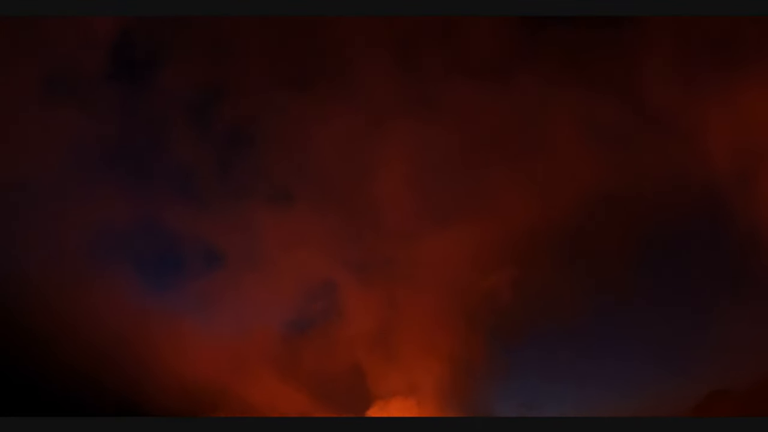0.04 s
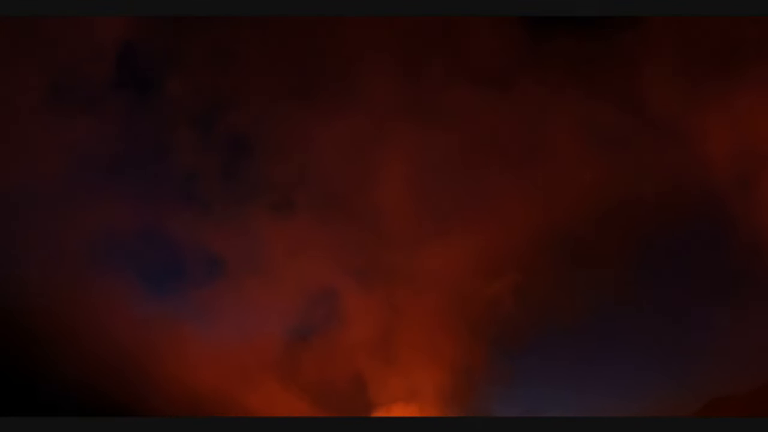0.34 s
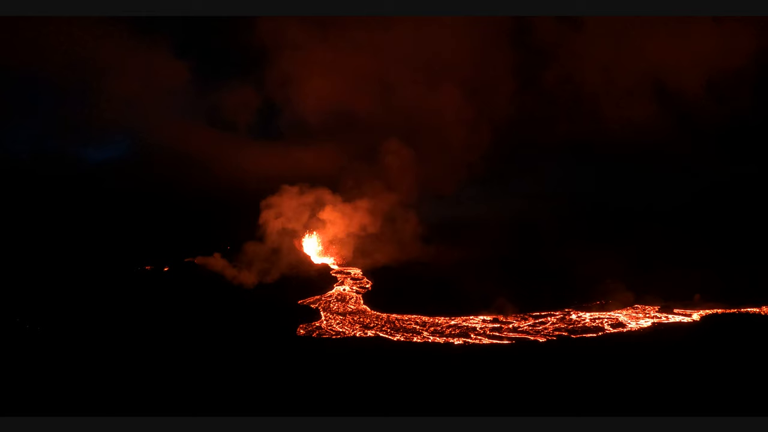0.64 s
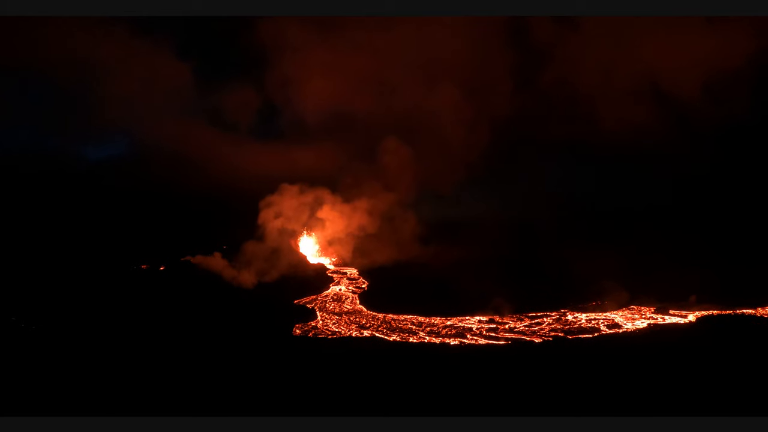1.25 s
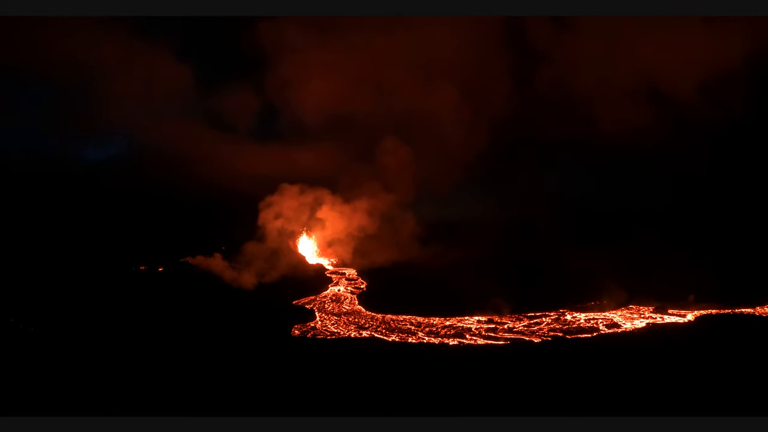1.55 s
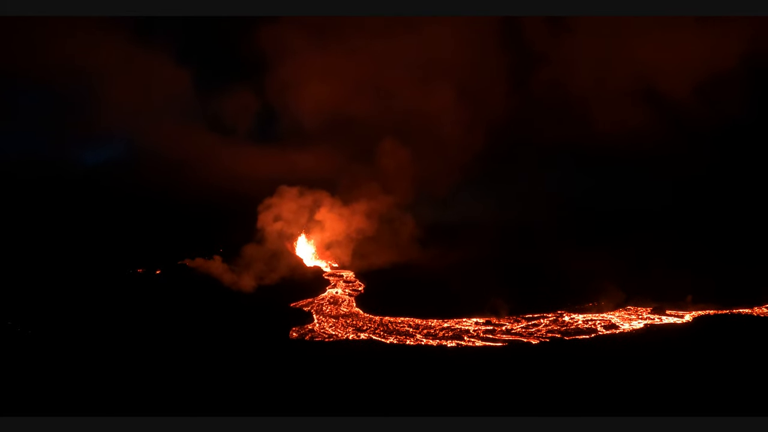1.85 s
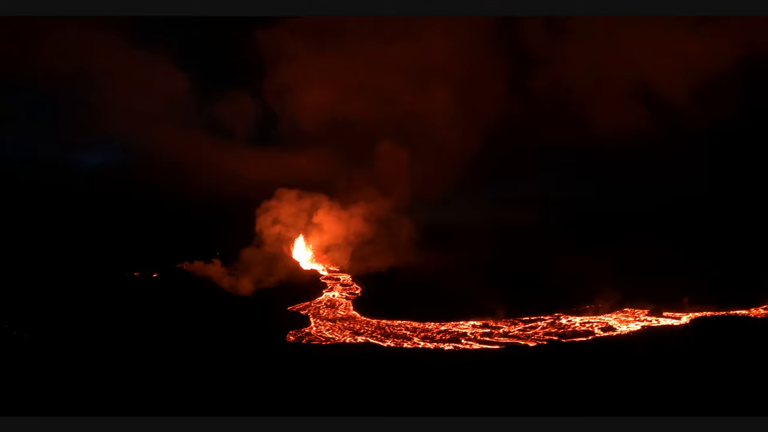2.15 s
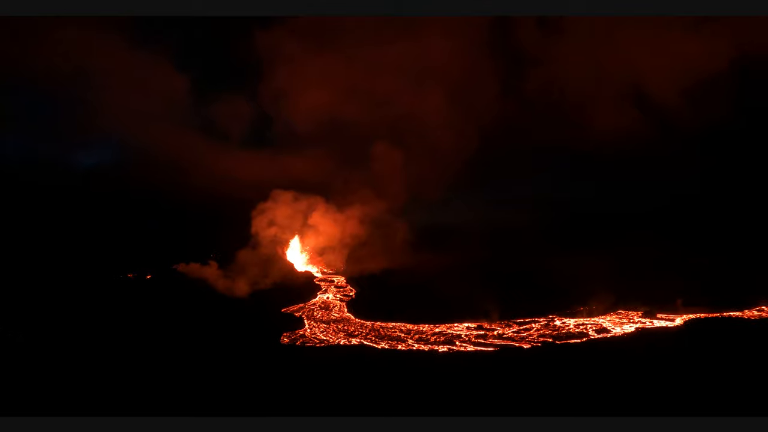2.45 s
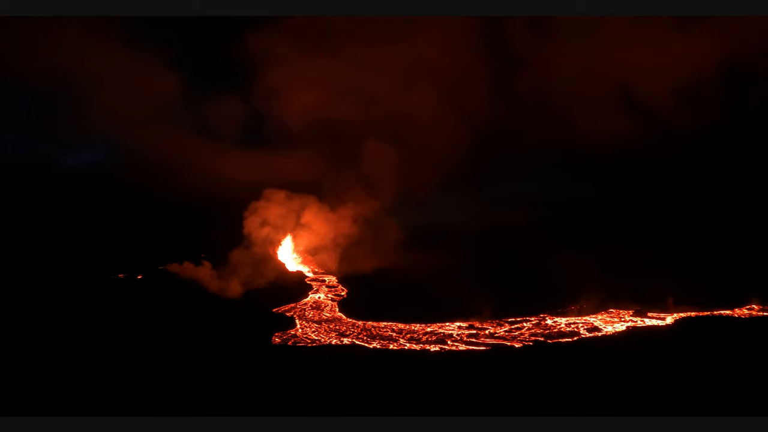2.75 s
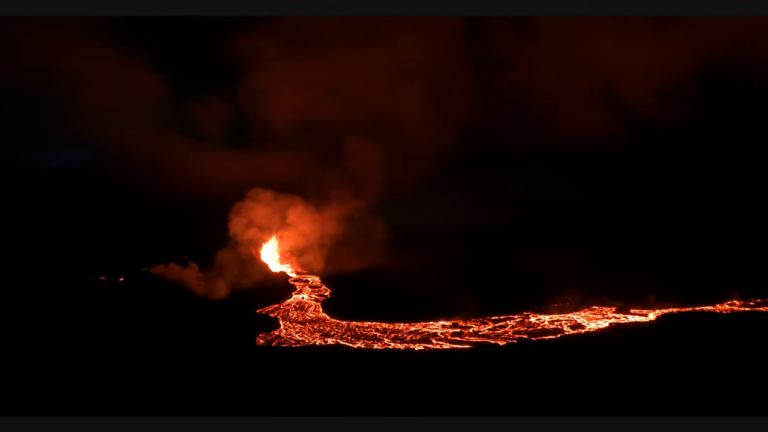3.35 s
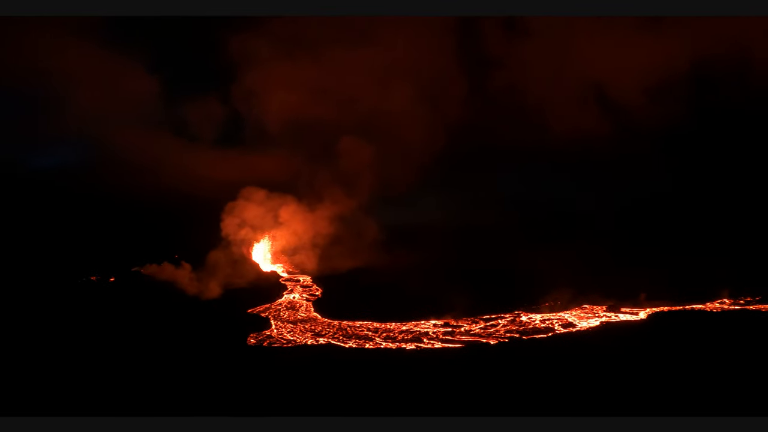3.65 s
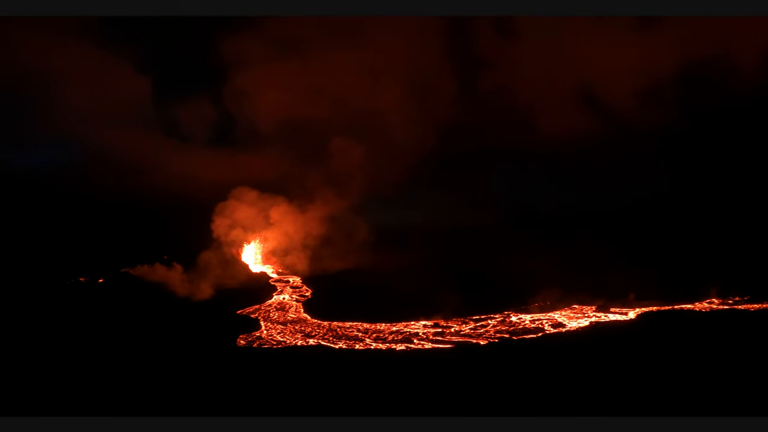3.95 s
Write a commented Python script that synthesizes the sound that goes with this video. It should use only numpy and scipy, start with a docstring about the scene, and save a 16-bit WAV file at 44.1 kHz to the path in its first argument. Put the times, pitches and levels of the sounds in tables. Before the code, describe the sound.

A far lava fountain makes a steady rushing roar in the open air. After a brief silent gap it returns, now with rough wind buffeting the microphone in short blasts and faint cloth swishes and ticks nearby.

```python
"""Windy night near a volcano

A far lava fountain roars, a rush of noise with flickering octaves, while eddies buffet the microphone.
A calmer scene cuts to silence; a windier one fades in, with flutter, short blasts and two falling tones.
Close by, cloth (probably a jacket) rustles as it slides and ticks as its creases snap."""
import sys
import numpy as np
from scipy import signal
from scipy.fft import rfft, irfft
from scipy.io import wavfile
from scipy.ndimage import uniform_filter1d

SR = 44100
rng = np.random.default_rng(int(sys.argv[2]) if len(sys.argv) > 2 else 0)


def store_pcm(level_fs):
    """Save levels as 16-bit WAV."""
    pcm = np.round(np.clip(level_fs, -1, 1) * 32767).astype(np.int16)
    wavfile.write(sys.argv[1], SR, np.atleast_2d(pcm).T)


N = 176400
TIME_S = np.arange(N) / SR
FREQ_HZ = np.maximum(np.fft.rfftfreq(N, 1 / SR), 1)


def undb(db):
    """Decibels to gain."""
    return 10 ** (np.asarray(db) / 20)


def envelope(rows):
    """Gain from (time_s, level_db) rows, linear in dB."""
    return undb(np.interp(TIME_S, *np.array(rows, float).T))


def unit(x):
    """Scale to rms 1."""
    return x / np.sqrt(np.mean(x ** 2))


def walk(rate_hz):
    """Smooth random drift, rms 1."""
    width = max(int(SR / rate_hz), 2)
    drift = uniform_filter1d(rng.standard_normal(N), width, mode="wrap")
    return unit(uniform_filter1d(drift, width, mode="wrap"))


def even(x, span_s):
    """Even out the strength of successive eddies over span_s; rms 1."""
    power = np.mean(np.atleast_2d(x) ** 2, axis=0)
    power = uniform_filter1d(power, int(span_s * SR))
    power = uniform_filter1d(power, int(span_s * SR / 2))
    return unit(x / np.sqrt(abs(power) + 1e-6))


def burst(centre_s, length_s):
    """Rounded swell, peak 1."""
    return 1 / np.sqrt(1 + (2 * (TIME_S - centre_s) / length_s) ** 4)


def stroke(start_s, attack_s, hold_s, decay_s):
    """Smooth rise, hold, exponential decay."""
    rise = .5 + .5 * np.tanh((TIME_S - start_s) / attack_s)
    return rise * np.exp(-np.maximum(TIME_S - start_s - hold_s, 0) / decay_s)


def colour(x, spectrum):
    """Filter by (freq_hz, gain_db) rows, falling steeply beyond both ends."""
    freq_hz, gain_db = np.array(spectrum, float).T
    gain = undb(np.interp(np.log(FREQ_HZ), np.log(freq_hz), gain_db))
    skirts = np.minimum(FREQ_HZ / freq_hz[0], 1) ** 3 * np.minimum(freq_hz[-1] / FREQ_HZ, 1) ** 3
    return irfft(rfft(x) * gain * skirts, N)


# Left-right difference of the microphone ports: freq_hz, gain_db
SIDE_SPECTRUM = [(20, -4.5), (300, -12.5), (700, 2.5), (2000, 1.5), (5000, 14), (14000, 5.5)]

def stereo_noise(spectrum, side_db=-65):
    """Coloured mid/side noise, rms 1; near mono by default."""
    mid, side = colour(rng.standard_normal((2, N)), spectrum)
    side = undb(side_db) * colour(side, SIDE_SPECTRUM)
    return unit(np.array([mid + side, mid - side]))


# Fountain spectra, calm and windy scene: freq_hz, relative_db
CALM_ROAR_SPECTRUM = [(170, -1), (280, -3.5), (400, -3.5), (530, -11), (660, -9), (850, -10.5),
                      (1100, -9.5), (1420, -15), (1700, -17), (1900, -16.5), (2150, -18), (2450, -20.5),
                      (2700, -21.5), (3000, -26.5), (3500, -29.5), (4300, -33), (5200, -36.5),
                      (6000, -46.5), (8000, -54), (10000, -62.5), (13000, -73)]
WINDY_ROAR_SPECTRUM = [(250, 1), (400, 6), (530, -0.5), (660, 7.5), (850, -1), (1100, 5), (1420, -3.5),
                       (1700, -0.5), (1900, -5.5), (2150, -2.5), (2450, -8.5), (2700, -9), (3000, -13.5),
                       (3500, -16), (4300, -25.5), (5200, -35.5), (6500, -39), (8000, -47.5), (12000, -71)]
# Fountain level, windy scene: time_s, level_db
WINDY_ROAR_LEVEL = [(.95, -47.5), (1.1, -41), (1.2, -38.5), (1.45, -37), (1.62, -35), (1.87, -34.5),
                    (2.12, -38.5), (2.4, -36.5), (2.55, -38), (2.75, -35), (3, -35.5), (3.28, -39.5),
                    (3.48, -35.5), (3.63, -36), (3.78, -36.5), (3.9, -37), (4, -40.5)]

def lava_fountain(spectrum, side_db=-65, flicker_db=0.8):
    """A far, steady rush whose octaves flicker on the way through the air."""
    rush = rfft(stereo_noise(spectrum, side_db))
    octave = np.clip(np.log2(FREQ_HZ / 125), 0, 6)
    roar = 0
    for k in range(7):
        band = irfft(rush * np.maximum(1 - abs(octave - k), 0), N)
        roar += band * undb(flicker_db * walk(rate_hz=42))
    return unit(roar)


# Cloth strokes: start_s, hold_s, level_db
SWISHES = [(0.114, 0.045, -57), (0.974, 0.54, -59.5), (1.135, 0.021, -48.5), (1.17, 0.19, -56.5),
           (1.232, 0.03, -41), (1.287, 0.026, -47.5), (1.335, 0.32, -56), (1.67, .16, -60.5),
           (1.73, 0.033, -54.5), (1.845, 0.13, -56.5), (2.07, 0.17, -65), (2.379, 0.007, -48.5),
           (2.427, 0.021, -53), (2.475, 0.098, -60.5), (2.617, 0.14, -65), (2.91, 0.041, -70.5),
           (3.078, 0.032, -56.5), (3.163, 0.066, -61), (3.24, 0.1, -71), (3.328, 0.18, -59.5),
           (3.518, 0.1, -63), (3.913, 0.1, -59.5)]
# Cloth friction spectrum: freq_hz, relative_db
CLOTH_SPECTRUM = [(1000, -17.5), (2500, 11.5), (4700, 9), (6400, 4), (8000, 0.5), (9000, -8), (10200, -12),
                  (12000, -26), (14000, -31.5)]
SNAP_DECAY_S = 0.002

def cloth_swishes(snaps_per_s=140, snap_db=0.5, snap_spread_db=4.2, grain_db=1):
    """Fabric slides in grainy, finely crackling swishes; longer strokes start more gently."""
    power = 0
    for start_s, hold_s, level_db in SWISHES:
        attack_s = 0.0095 + .08 * hold_s
        power += (undb(level_db) * stroke(start_s, attack_s, hold_s, decay_s=0.018)) ** 2
    onsets = rng.random(N) < snaps_per_s / SR
    snaps = onsets * undb(snap_db + snap_spread_db * rng.standard_normal(N))
    crackle_power = signal.lfilter([1], [1, -np.exp(-2 / (SNAP_DECAY_S * SR))], snaps ** 2)
    grain_power = unit(undb(grain_db * walk(rate_hz=300))) ** 2
    return stereo_noise(CLOTH_SPECTRUM) * np.sqrt(power * (grain_power + crackle_power))


# Crease snaps: start_s, relative_db, centre_hz
TICKS = [(1.1508, -56, 7000), (1.5055, -45, 7000), (1.5104, -46, 7000), (1.5294, -37, 5200),
         (1.5404, -54, 8500), (1.5978, -46, 6500), (1.6244, -56, 9000), (1.7315, -39, 5500),
         (1.7893, -44, 5500), (2.0857, -48, 6000), (2.5674, -57, 6460), (2.6944, -54, 7500),
         (3.197, -47, 6650), (3.459, -51, 6800), (3.6581, -47, 5500)]

def cloth_ticks(gain_db=-3.5, half_width_octaves=0.38):
    """Creases snap softly, each in its own noise band."""
    white = rfft(rng.standard_normal(N))
    ticks = 0
    for start_s, relative_db, centre_hz in TICKS:
        band_pass = 1 / (1 + (np.log2(FREQ_HZ / centre_hz) / half_width_octaves) ** 4)
        band = unit(irfft(white * band_pass, N))
        snap = stroke(start_s, attack_s=.0008, hold_s=0, decay_s=SNAP_DECAY_S)
        ticks += band * snap * undb(relative_db + gain_db)
    return ticks


# Falling tones: centre_s, length_s, level_db, pitch_hz
FALLING_TONES = [(2.582, .03, -31.5, 380), (2.875, .019, -24.5, 440)]

def falling_tones(fall_octaves_per_s=14, jitter_hz=50):
    """Two brief, hollow, falling tones within the wind blasts."""
    tones = 0
    for centre_s, length_s, level_db, pitch_hz in FALLING_TONES:
        offset_s = np.clip(TIME_S - centre_s, -length_s, length_s)
        glide_hz = pitch_hz * 2 ** (-fall_octaves_per_s * offset_s)
        phase = 2 * np.pi * np.cumsum(glide_hz + jitter_hz * walk(rate_hz=400)) / SR
        tones += unit(np.sin(phase)) * undb(level_db) * burst(centre_s, length_s)
    return tones


# Fine turbulence spectrum: freq_hz, relative_db
FLUTTER_SPECTRUM = [(60, 6.5), (140, 2.5), (250, 3.5), (400, 0.5), (700, -7.5), (1200, -17), (2500, -48),
                    (5000, -45.5)]
# Fine turbulence level: time_s, level_db
FLUTTER_LEVEL = [(1, -36), (1.15, -32), (1.35, -26), (1.56, -28.5), (1.75, -27.5), (1.9, -31), (2.1, -32.5),
                 (2.24, -31), (2.35, -34), (2.62, -34.5), (2.8, -32.5), (2.97, -34.5), (3.12, -38),
                 (3.25, -43), (3.5, -48.5), (4, -42)]

def wind_flutter(roughness_db=1.5):
    """Small eddies arrive in rough, rapid puffs."""
    puffs = undb(roughness_db * walk(rate_hz=39)) * stereo_noise(FLUTTER_SPECTRUM)
    return even(puffs, span_s=0.1) * envelope(FLUTTER_LEVEL)


# Wind blasts: centre_s, length_s, level_db, low_hz, high_hz
BLASTS = [(1.081, 0.0048, -24.5, 50.7, 168.5), (1.16, 0.03, -33.5, 199.5, 450),
          (1.43, .025, -32, 78.4, 150), (1.481, 0.022, -31, 199, 374), (1.54, 0.025, -22, 150.4, 380),
          (1.564, .03, -30.5, 400, 854), (1.878, 0.019, -27.5, 100.3, 450), (1.919, .035, -27, 89.7, 170),
          (2.233, .012, -25, 101, 237), (2.291, 0.018, -25, 150, 678), (2.452, 0.018, -22, 170, 276),
          (2.593, .045, -33, 300, 750), (2.716, 0.021, -32.5, 130, 209), (2.769, 0.018, -20.5, 85.7, 132),
          (2.874, 0.018, -26, 168, 760), (3.012, 0.018, -25, 90, 161), (3.021, 0.009, -25, 132, 763),
          (3.064, 0.014, -24, 129, 257), (3.097, 0.015, -21, 109, 259), (3.174, 0.024, -26.5, 120, 272),
          (3.42, 0.016, -28, 88.7, 168), (3.513, .06, -23, 84.6, 127), (3.622, 0.018, -20.5, 78.3, 123),
          (3.8, 0.013, -18.5, 70, 300), (3.802, 0.012, -28.5, 400, 927), (3.824, 0.039, -30, 127.3, 615)]

def wind_blasts(rolloff_order=2.7):
    """Brief blasts hit the port, each in its own band: some thump low, others reach higher and tear."""
    blasts = 0
    for centre_s, length_s, level_db, low_hz, high_hz in BLASTS:
        high_pass = 1 / (1 + (low_hz / FREQ_HZ) ** 4)
        ratio = FREQ_HZ / high_hz
        low_pass = 1 / np.sqrt((1 + ratio) * (1 + ratio ** (2 * rolloff_order)))
        air = unit(irfft(rfft(rng.standard_normal(N)) * high_pass * low_pass, N))
        blasts += even(air, length_s) * undb(level_db) * burst(centre_s, length_s)
    return blasts


# Wind pressure spectra, calm and windy scene: freq_hz, relative_db
CALM_BUFFET_SPECTRUM = [(16, -12.5), (30, 3.5), (48, -3.5), (70, -6.5), (100, -8.5), (140, -16),
                        (200, -20.5)]
WINDY_BUFFET_SPECTRUM = [(15, -32.5), (24, -2), (36, 3.5), (60, -0.5), (110, -6), (160, -12.5),
                         (220, -20.5), (400, -44), (900, -61.5)]
# Wind pressure, windy scene: time_s, relative_db
WINDY_BUFFET_LEVEL = [(.95, -32), (1.04, -34), (1.08, -29), (1.13, -28), (1.19, -33), (1.25, -33),
                      (1.35, -28), (1.57, -27), (1.63, -19), (1.68, -26), (1.82, -26), (1.87, -23),
                      (1.93, -25), (2.02, -24), (2.09, -28), (2.2, -22.5), (2.32, -29), (2.38, -21.5),
                      (2.45, -22), (2.5, -33), (2.56, -21), (2.63, -27), (2.68, -19.8), (2.98, -19.3),
                      (3.18, -20.5), (3.22, -28), (3.33, -28), (3.44, -19.5), (3.51, -27), (3.61, -18.5),
                      (3.7, -23), (3.79, -17), (3.9, -22.5)]

def wind_buffets(spectrum, side_db=-65):
    """Large eddies of similar strength push on the microphone one after another."""
    return even(stereo_noise(spectrum, side_db), span_s=0.085)


def scene():
    """A calm, slightly wide scene, a silence, then a windy one in near mono."""
    rustle = cloth_swishes() + cloth_ticks()
    calm = lava_fountain(CALM_ROAR_SPECTRUM, side_db=-16) * undb(-34.5)
    calm += wind_buffets(CALM_BUFFET_SPECTRUM, side_db=-13.5) * undb(-29.5)

    windy = wind_buffets(WINDY_BUFFET_SPECTRUM) * envelope(WINDY_BUFFET_LEVEL) * undb(1)
    windy += wind_flutter() + wind_blasts() + falling_tones()
    windy += lava_fountain(WINDY_ROAR_SPECTRUM) * envelope(WINDY_ROAR_LEVEL)

    cut_s, fade_start_s, fade_s = .635, 0.917, 0.091
    calm_gate = np.clip(np.minimum(TIME_S, cut_s - TIME_S) / .001, 0, 1)
    fade_in = np.clip((TIME_S - fade_start_s) / fade_s, 0, 1) ** 1.43
    fade_out = np.clip((TIME_S[-1] - TIME_S) / 0.0017, 0, 1)
    return (calm + rustle) * calm_gate + (windy + rustle) * fade_in * fade_out


def record(dry):
    """Soft clipping rounds the strongest buffets; a steep low-pass cuts the top."""
    ceiling, cutoff_hz = .42, 12400
    rounded = dry / (1 + (dry / ceiling) ** 4) ** .25
    low_pass = signal.ellip(8, .2, 70, cutoff_hz, fs=SR, output="sos")
    return signal.sosfilt(low_pass, rounded)


dry = scene()
out = record(dry)
store_pcm(out)
```